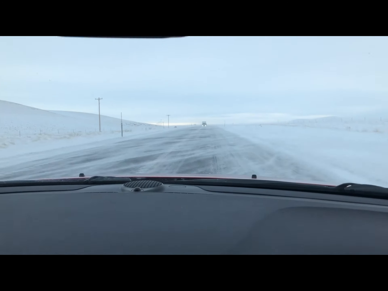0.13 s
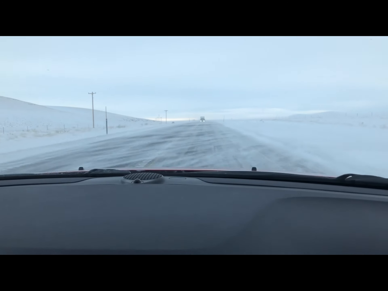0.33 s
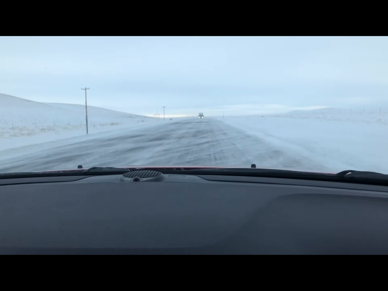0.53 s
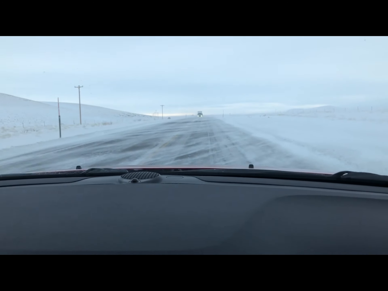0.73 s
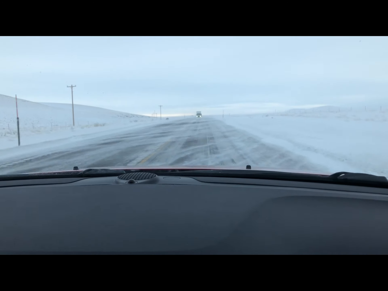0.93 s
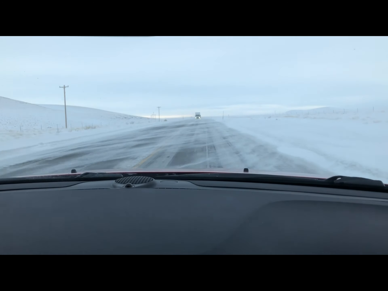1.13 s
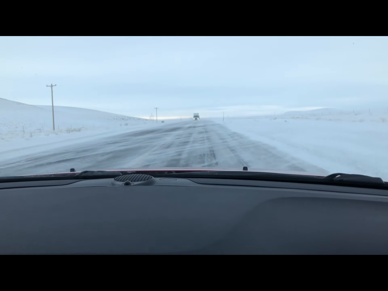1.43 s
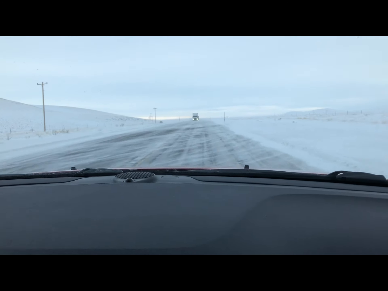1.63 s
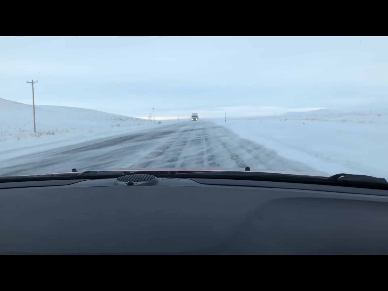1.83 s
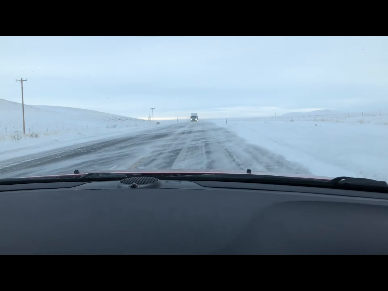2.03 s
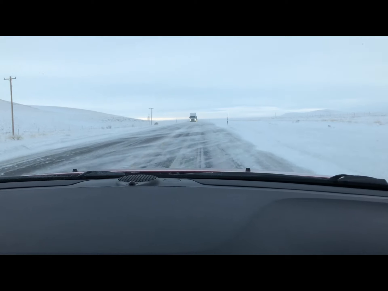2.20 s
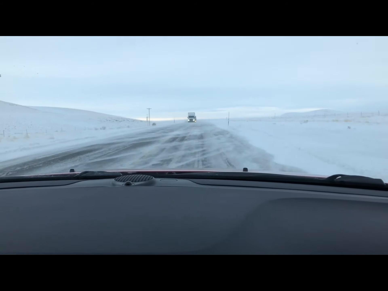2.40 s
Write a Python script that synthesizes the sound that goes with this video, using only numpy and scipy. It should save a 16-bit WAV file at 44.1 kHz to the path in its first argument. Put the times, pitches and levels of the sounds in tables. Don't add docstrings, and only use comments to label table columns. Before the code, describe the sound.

Deep, lumpy rumble of a car driving over packed snow, heard inside the cabin near the dash, with steady muffled tyre and wind roar, faint seal hiss, and a small gritty tick around half a second.

```python
import sys
import numpy as np
from scipy import signal
from scipy.fft import rfft, irfft
from scipy.io import wavfile
from scipy.ndimage import uniform_filter1d

SR = 44100
rng = np.random.default_rng(int(sys.argv[2]) if len(sys.argv) > 2 else 0)


def invert_db(x):
    u = np.asarray(x, float) / 20
    return 10 ** u


def output_pcm(signal):
    pcm = np.clip(np.atleast_2d(signal).T, -1, 1) * 32767
    wavfile.write(sys.argv[1], SR, np.round(pcm).astype(np.int16))


N = 112896

# time in seconds, wind level in dB.
WIND = [(0.0, -45.5), (0.2, -45.5), (0.4, -46), (.62, -46), (0.85, -45.5), (1.02, -47), (1.18, -47.5),
        (1.35, -48), (1.55, -46), (1.74, -48), (1.95, -47.5), (2.2, -47.5), (2.4, -49.5), (2.56, -47.5)]
WIND_MEAN_DB = -48


def evened(x):
    return x / np.sqrt(np.mean(x ** 2) + 1e-20)


def read(points, hz):
    f, value = np.transpose(points)
    return np.interp(np.log(hz + 1), np.log(f + 1), value)


def follow(curve):
    return np.interp(np.arange(N) / SR, *np.transpose(curve))


def resonate(x, hz, width):
    r = np.exp(-np.pi * width / SR)
    pole = r * np.exp(2j * np.pi * hz / SR)
    return 2 * signal.lfilter([1 - r], [1, -pole], x).real


def rush(shape, size, patchy_db, flicker_db):
    hop = size // 4
    frames = N // hop + 5
    hz = np.fft.rfftfreq(size, 1 / SR)
    a, b, patches = rng.standard_normal((frames, len(hz), 3)).T
    patches = uniform_filter1d(patches, size=12, axis=0)
    patches = evened(uniform_filter1d(patches, size=12, axis=1))
    flicker = evened(uniform_filter1d(rng.standard_normal(frames), size=6))
    level_db = read(shape, hz)[:, None] + patchy_db * patches + flicker_db * flicker
    z = (a + 1j * b) * invert_db(level_db)
    return evened(signal.istft(z, nperseg=size, noverlap=size - hop)[1][:N])


def hiss():
    # frequency in Hz, density in dB per Hz.
    seal_spectrum = [(2240, -14.5), (3800, -3.5), (4950, -6.5), (6220, -11.5), (7230, -18.5), (11800, -22),
                     (15200, -17.5), (16000, -26.5)]
    gust_db = 1.0 * (follow(WIND) - WIND_MEAN_DB)
    under_wind_db = -12.5
    noise = rush(seal_spectrum, size=512, patchy_db=0.64, flicker_db=0.5)
    return invert_db(WIND_MEAN_DB + under_wind_db + gust_db) * noise


def roar():
    # frequency in Hz, density in dB per Hz.
    tyre_spectrum = [(210, -18), (350, -1), (637, -7), (764, -7.5), (887, -11.5), (1680, -18.5),
                     (2130, -18.5), (3830, -27), (4500, -37.5), (5850, -76), (9900, -120)]
    gust_db = 0.85 * (follow(WIND) - WIND_MEAN_DB)
    over_wind_db = 10
    noise = rush(tyre_spectrum, size=1024, patchy_db=0.44, flicker_db=0.75)
    return invert_db(WIND_MEAN_DB + over_wind_db + gust_db) * noise


def tick(start, level_db, tilt_db, ring_db, t60):
    # frequency in Hz, density in dB per Hz.
    glass_spectrum = [(1760, -31), (3000, -11), (3780, -3), (4760, -2.5), (7500, -11), (9010, -10.5),
                      (16000, -8.5)]
    # mode frequency in Hz, width in Hz, level in dB.
    pane_modes = [(4830, 500, -1), (5600, 900, -3), (6900, 800, -2), (7840, 900, -4)]
    rise_s, hold_s, grit_db = 0.0045, 0.007, 1.2
    low_hz, low_lag_s = 6200, 0.0025

    t = np.arange(4096) / SR
    hz = np.fft.rfftfreq(len(t), 1 / SR)
    burst, grit = rng.standard_normal((2, len(t)))
    burst = burst * invert_db(grit_db * evened(uniform_filter1d(grit, size=30)))
    colour_db = read(glass_spectrum, hz) + tilt_db * np.log2(hz / 7000 + 0.01)
    plain = evened(irfft(rfft(burst) * invert_db(colour_db)))
    ring = np.zeros(len(t))
    for f, width, db in pane_modes:
        ring += invert_db(db) * evened(resonate(resonate(burst, f, width), f, width))
    sound = evened(plain + invert_db(ring_db) * evened(ring))
    low = irfft(rfft(sound) / (1 + (hz / low_hz) ** 8))

    def swell(u):
        rise = np.sin(np.pi / 2 * np.clip(u / rise_s, 0, 1))
        return rise * invert_db(level_db - 60 * np.maximum(u - hold_s, 0) / t60)

    out = np.zeros(N + len(t))
    out[round(start * SR):][:len(t)] = swell(t) * (sound - low) + swell(t - low_lag_s) * low
    return out[:N]


def ice():
    # start in seconds, level in dB, brightness in dB per octave,
    # pane ring in dB, decay time t60 in seconds.
    grains = [
        (0.4757, -41.5, 1.5, -9, 0.075),
        (0.5235, -53.5, -4, -2, .055),
        (.915, -61, -7, -10, .25),
        (1.4158, -47.5, 4, -24, 0.077),
    ]
    return sum(tick(*row) for row in grains)


def rumble():
    # time in seconds, rumble level in dB.
    road_load = [(0, -27), (.6, -28.5), (1.3, -28.5), (1.9, -28.5), (2.56, -29.5)]
    # frequency in Hz, density in dB per Hz.
    body_spectrum = [(15, -42), (45, 0), (70, -3.5), (105, -1), (146, -6.5), (298, -9), (450, -28),
                     (700, -65)]
    # frequency in Hz, width in Hz, level in dB relative to the rumble.
    cabin_modes = [(239.8, 55, -13), (308.5, 107, -13.5)]
    shake = rng.standard_normal(N)
    booms = np.zeros(N)
    for hz, width, db in cabin_modes:
        booms += invert_db(db) * evened(resonate(resonate(shake, hz, width), hz, width))
    noise = rush(body_spectrum, size=4096, patchy_db=-1.0, flicker_db=-0.7)
    return invert_db(follow(road_load)) * evened(noise + booms)


def jolts(rows, rise_s, fall_s, trim_db):
    out = np.zeros(N)
    for (peak, level_db, hz), phase in zip(rows, rng.random(len(rows))):
        t = np.arange(N) / SR - peak
        swing = np.exp(-0.5 * (t / np.where(t < 0, rise_s, fall_s)) ** 2)
        out += swing * invert_db(level_db + trim_db) * np.sin(2 * np.pi * (hz * t + phase))
    return np.sqrt(2) * out


def bumps():
    # peak time in seconds, level in dB, body pitch in Hz.
    heaves = [(0.029, -22.5, 67), (0.061, -27, 110), (0.104, -20.5, 69), (0.114, -33, 111),
              (0.167, -28, 132), (0.193, -27, 81), (0.209, -24.5, 55.8), (0.24, -26, 104.0),
              (0.297, -19, 66), (0.301, -28.5, 92), (0.382, -29.5, 118.0), (0.442, -25.5, 80),
              (0.452, -31, 136), (0.516, -26.5, 72.5), (0.564, -25, 70), (0.568, -28, 44.0),
              (0.627, -26.5, 87), (0.64, -26, 116), (0.732, -20.8, 81), (0.734, -28, 126.0),
              (0.779, -30, 70.0), (0.78, -28, 102.0), (0.853, -23.5, 90.0), (0.859, -31.5, 42.0),
              (0.875, -28.5, 126), (0.953, -28.5, 95), (0.988, -26.5, 110.3), (1.024, -22.0, 94.2),
              (1.048, -27.5, 65.2), (1.085, -30.5, 91), (1.18, -25.5, 95), (1.187, -25, 65.4),
              (1.314, -24.5, 87.3), (1.353, -23, 109.5), (1.371, -30.5, 64.5), (1.439, -29, 53),
              (1.461, -25.5, 98.6), (1.519, -23.1, 85.5), (1.59, -24.5, 102.6), (1.624, -28.5, 48.0),
              (1.663, -24.5, 71), (1.715, -28, 93), (1.77, -31, 98), (1.778, -28.5, 67.6),
              (1.81, -29, 42.0), (1.838, -26, 78.0), (1.914, -24.5, 67.7), (1.945, -25.5, 111),
              (2.015, -27, 52.0), (2.134, -26, 51), (2.255, -24.5, 86), (2.317, -25.5, 77.6),
              (2.374, -26.2, 99), (2.412, -28.6, 75.4), (2.471, -26, 86.4), (2.536, -28.5, 96.8)]
    # peak time in seconds, level in dB, panel pitch in Hz.
    drums = [(0.015, -30.3, 278), (0.111, -27.5, 183), (0.112, -31.5, 241), (0.19, -29, 202),
             (0.2, -30.5, 256), (0.229, -31, 223), (0.239, -26.5, 143.0), (0.278, -28.5, 210),
             (0.307, -31.5, 265), (0.33, -28, 141), (0.335, -26.5, 196), (0.343, -27.5, 240),
             (0.357, -30.6, 285), (0.382, -33, 185), (0.401, -33.5, 325), (0.423, -27.5, 208),
             (0.47, -32.5, 282), (0.479, -30.2, 157), (0.496, -29, 223), (0.527, -33, 136),
             (0.53, -27, 299.4), (0.643, -30.5, 243), (0.691, -33, 314), (0.78, -30, 276),
             (0.797, -31.5, 199.0), (0.849, -28.5, 149), (0.911, -26.5, 224), (0.926, -33, 286),
             (0.967, -30, 219.0), (0.981, -32.5, 299.0), (1.045, -32.5, 176), (1.132, -37.5, 320),
             (1.14, -26.5, 175), (1.314, -27, 177.0), (1.456, -27, 181), (1.484, -31, 133),
             (1.503, -33, 199.0), (1.519, -28.8, 235.6), (1.55, -37.5, 260), (1.566, -28, 161),
             (1.696, -35, 219), (1.703, -29, 149.0), (1.769, -29.5, 173), (1.792, -32.5, 249.0),
             (1.842, -29.9, 137), (1.881, -31, 138), (1.959, -28, 178), (2.033, -33.5, 255),
             (2.107, -28, 199), (2.146, -33, 233), (2.343, -32.5, 186), (2.351, -29.5, 240),
             (2.361, -28, 136), (2.501, -26.5, 182), (2.504, -34, 251.0), (2.545, -30, 302)]
    body = jolts(heaves, rise_s=0.018, fall_s=0.02, trim_db=-0.5)
    panels = jolts(drums, rise_s=0.013, fall_s=0.015, trim_db=-2)
    return body + panels


def scene():
    return (hiss() + roar() + ice() + rumble() + bumps())[None]


def band_limit(x):
    return signal.sosfilt(signal.butter(12, 16710, fs=SR, output="sos"), x)


def record(dry):
    # frequency in Hz, gain in dB.
    response = [(12, -38), (22, -15), (30, 3), (40, 1.5), (9000, 0), (14800, -6), (15600, 1)]
    band_limit_hz, fade_s = 15830, 0.001
    held = np.pad(dry, ((0, 0), (4096, 4096)), mode="reflect")
    hz = np.fft.rfftfreq(held.shape[1], 1 / SR)
    gain = invert_db(read(response, hz)) * (hz < band_limit_hz)
    heard = irfft(rfft(held) * gain, held.shape[1])[:, 4096:-4096]
    t = np.arange(N) / SR
    fade_in = np.sin(np.pi / 2 * np.clip(t / fade_s, 0, 1)) ** 2
    return band_limit(fade_in * heard)


dry = scene()
out = record(dry)
output_pcm(out)
```